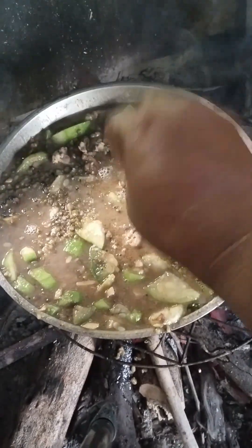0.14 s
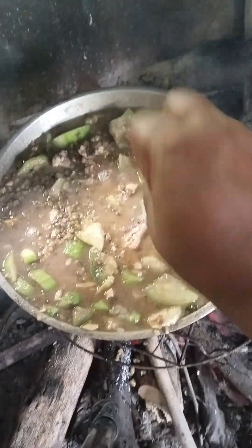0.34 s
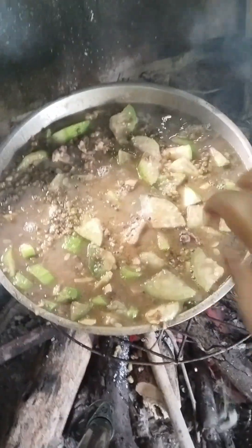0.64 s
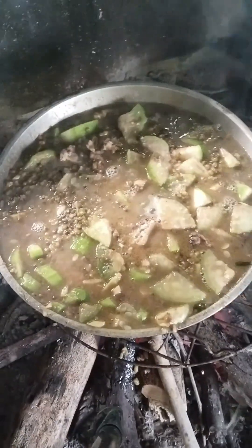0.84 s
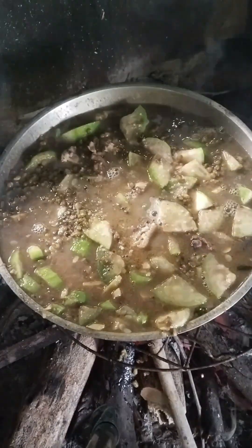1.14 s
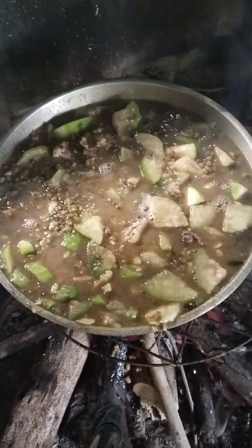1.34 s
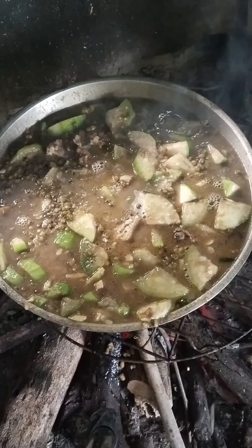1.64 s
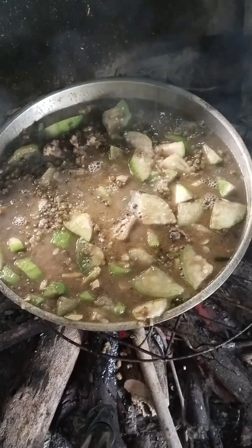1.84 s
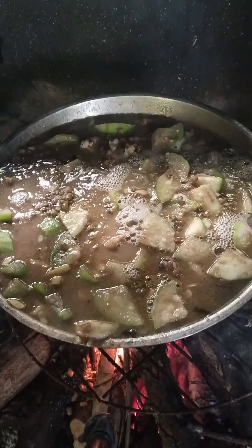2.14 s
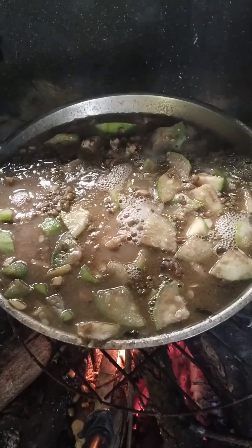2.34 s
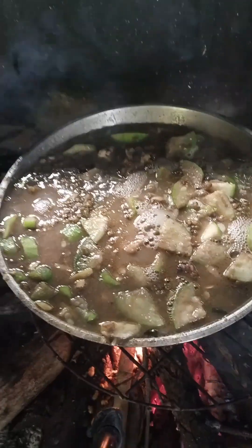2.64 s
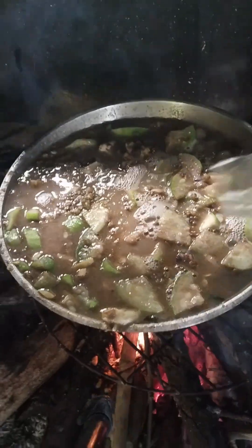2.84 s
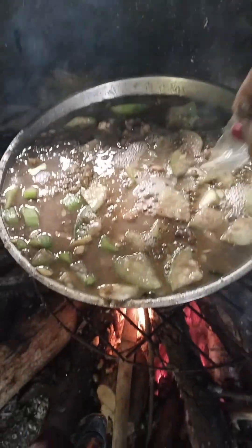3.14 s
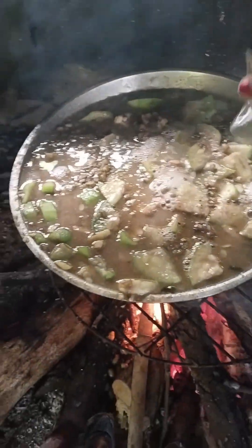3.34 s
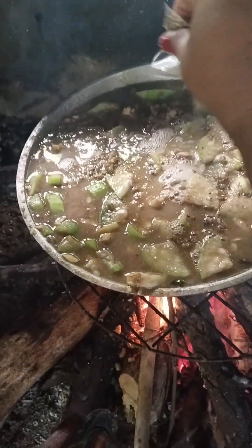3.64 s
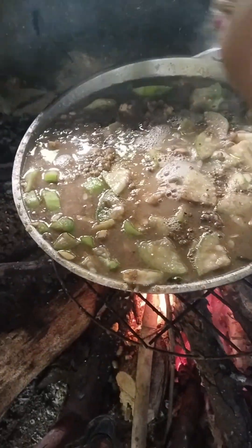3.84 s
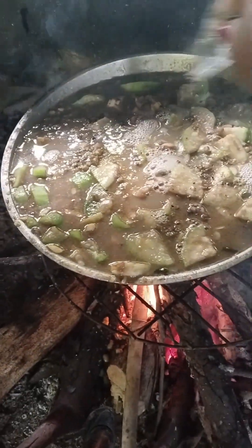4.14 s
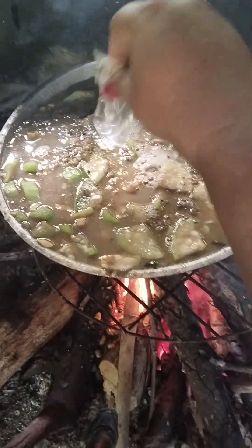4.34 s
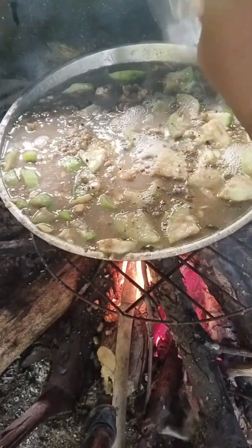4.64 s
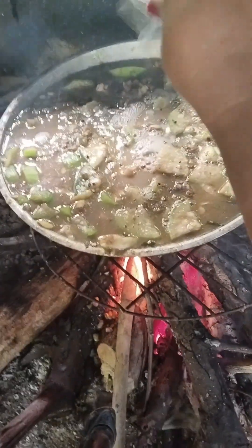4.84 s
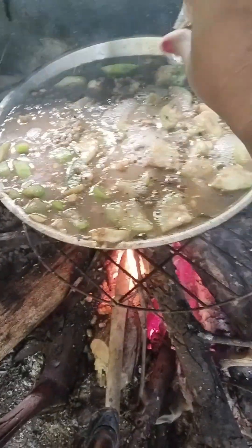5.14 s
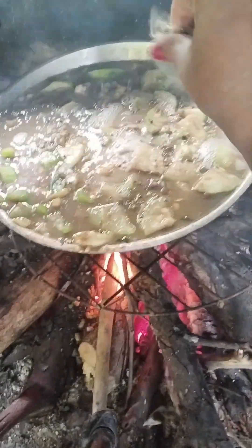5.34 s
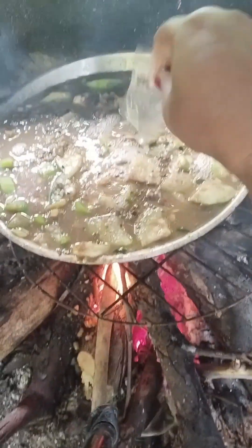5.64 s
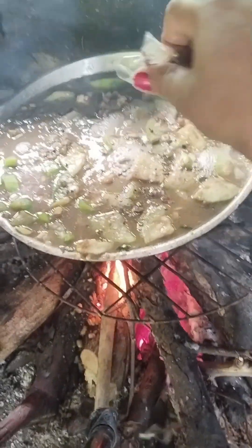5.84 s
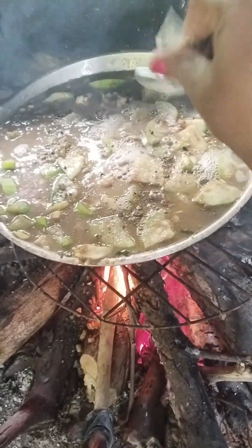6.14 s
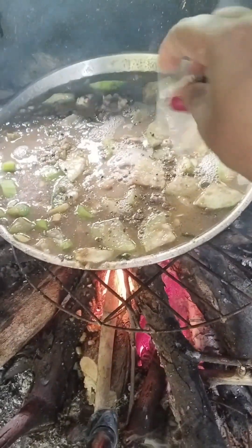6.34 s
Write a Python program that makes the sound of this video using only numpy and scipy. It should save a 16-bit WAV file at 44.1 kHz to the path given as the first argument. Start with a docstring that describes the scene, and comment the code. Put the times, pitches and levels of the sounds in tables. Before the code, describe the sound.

At the very start a small, brief splash falls into soup bubbling softly in a wide metal pot, over the low rumble of a wood fire. Two birds whistle faintly until about 1.6 seconds, and twigs pop three times between 0.6 and 1.1 seconds. Thin insect hiss runs behind everything, and a very faint motor drones far away. At about 2.2 seconds the motor stops and the sound is suddenly closer: the boil is louder and busier, with plops that make the pot ring lightly and occasional low gulps of steam. From 2.3 seconds to the end, around 6.5 seconds, a hand crumples a thin plastic sachet close by in irregular crinkles and sharp snaps, louder than the boil. The strongest snap comes at 4 seconds, with another dense flurry from 5.1 to 5.6. Two faint hoots sound near 3.6 seconds. The open shelter adds a short, soft echo.

```python
"""A wide metal pot of soup boils over a wood fire under an open shelter: bubbles collapse and make
the pot ring. At first a handful splashes in, two birds whistle, twigs pop, a motor drones far off
and insects hiss. Then the phone is nearer and the boil harder, while a hand crumples a plastic
sachet whose film buckles and snaps. Two faint hoots sound during the crumpling."""
import sys
import numpy as np
from scipy import signal
from scipy.fft import rfft, irfft
from scipy.io import wavfile
from scipy.ndimage import uniform_filter1d

SR = 44100
rng = np.random.default_rng(int(sys.argv[2]) if len(sys.argv) > 2 else 0)


def inscribe(sig):
    """Save sig as 16-bit PCM at rate SR to the path in sys.argv[1].

    A 1-D sig is mono; a 2-D sig holds one channel per row.
    Samples are clipped to [-1, 1] before scaling.
    """
    pcm = np.round(np.clip(np.atleast_2d(sig).T, -1, 1) * 32767)
    wavfile.write(sys.argv[1], SR, pcm.astype(np.int16))


N = 286517
NEAR_S = 2.19  # the phone is close to the pot from here on
MIC_LAG_S = 0.00022  # the right microphone is further from the pot
FILM_ALIKE = 0.12  # share of crackling noise common to both sides

# Tone of the background noise, far and near: frequency_hz, gain_db
FAR_TONE = [(15, -83), (25, -12.5), (120, -4), (200, -9), (270, -4.5), (326, -13), (480, -11), (555, -5),
            (640, -10), (796, -16), (1230, -21.5), (1840, -20), (2760, -21), (8140, -28.5), (9070, -18.5),
            (9840, -23), (16000, -36.5)]
# (the dips near 4.9 and 12.5 kHz come from the phone's audio coding)
NEAR_TONE = [(15, -26), (25, -17.5), (195, 1), (309, -3), (641, -5.5), (1520, -16.5), (2760, -15.5),
             (3720, -14), (4870, -31), (6050, -24.5), (10400, -6.5), (11600, -11), (12500, -28),
             (16000, -34)]
# Bands of insect hiss: centre_hz, width_hz, level_db
INSECT_BANDS = [(6500, 2000, -72), (8230, 660, -66.5), (10300, 1600, -62.5)]
# Whistles and low hoots: start_s, length_s, pitch_hz, level_db, drop_hz
HIGH_BIRD_NOTES = [(0., 0.11, 2950, -68, 45), (.24, 0.11, 3000, -61, 196), (.352, 0.041, 3020, -67, 52),
                   (.512, 0.078, 2960, -60, 77), (.612, 0.019, 2930, -61, 22), (.655, 0.04, 2940, -66, 33),
                   (.75, 0.036, 2930, -58, -26), (.804, 0.024, 2940, -58.5, 170),
                   (.865, 0.019, 2950, -61, 80), (.96, 0.026, 2900, -61, 23), (1.012, 0.02, 2844, -60, 75),
                   (1.04, 0.031, 2840, -63.5, 0), (1.137, 0.052, 2800, -63, 150),
                   (1.29, 0.045, 2700, -68, 90), (1.36, .05, 2660, -74, 20), (1.432, 0.02, 2550, -70, 28)]
LOW_BIRD_NOTES = [(.24, .06, 1790, -70, 30), (.485, .094, 2110, -71, 0), (.67, .07, 1740, -75, 0),
                  (1.31, .07, 1770, -72.5, 30), (1.58, .037, 1820, -68, 0)]
HOOT_NOTES = [(3.56, 0.065, 323.7, -60, -5), (3.62, 0.12, 444, -61.5, 31)]
# Fire pops, soft fizzes and plastic creases flipping:
# start_s, peak_db, centre_hz, left_minus_right_db, bright_db, rattle_db
FIRE_POPS = [(.6444, -37, 9100, 1, -2, 5), (0.8712, -23.5, 6540, 3, -11, -7),
             (1.059, -42, 10200, 7, -23, -7)]
SOFT_FIZZES = [(.062, -41, 14000, 5, 0, -20), (.113, -49, 11000, 3, 3, -20), (.346, -47, 14000, 3, 0, -20),
               (.545, -49, 8950, 3, 3, -20)]
CREASE_SNAPS = [(2.3223, -20.5, 4100, -5, 2, -31), (2.5641, -30.5, 9450, -5, -23, -16),
                (2.6264, -45, 10100, -7, -12, -10), (2.6424, -23, 9900, 4, -2, -9.5),
                (2.7763, -35.5, 9900, 1.5, -14, -7), (2.8777, -22, 4600, 2, 2, -12),
                (2.983, -43, 8000, 2, -6, -17), (3.0101, -33.5, 7080, 11, -2, -18),
                (3.022, -45, 7500, 1, -6, -20), (3.0355, -28.5, 5000, 6, 19, -23),
                (3.087, -43, 7500, 4, -6, -20), (3.096, -39, 6000, 0, -3, -20),
                (3.1064, -28, 9800, 3.0, -12, -10), (3.1194, -20.5, 8100, 4, 2, -12),
                (3.154, -30, 7000, 7, -4, -14), (3.1585, -35, 9000, 3, -6, -14),
                (3.337, -36, 7500, 7, -6, -18), (3.3714, -39, 6260, 11, -12, -12),
                (3.381, -32, 7500, 2, -6, -12), (3.4104, -39, 5590, 5, -12, -12),
                (3.4491, -39, 10300, 2.5, -12, -12), (3.5323, -30, 10500, 7, -3, -1),
                (3.5453, -25.5, 4540, -3, -9, -2), (3.6354, -32.5, 8370, 6, 3, -14),
                (3.6597, -35, 10200, 6, -12, -12), (3.706, -37, 7390, -3, -9, -18),
                (3.724, -32, 8000, 3, -4, -15), (3.7609, -30, 8700, 6, -2, -15),
                (3.775, -33, 7000, 6, -4, -12), (3.8114, -44, 10200, 3.0, -12, -12),
                (3.8583, -36, 10100, 8, -12, -6), (3.8721, -32, 7750, 15, -10, -12),
                (3.8994, -34, 4510, 12, -14, -14), (3.9179, -26, 8000, 8, -2, -14),
                (3.9787, -25, 4860, -2, -4, -15), (4.0182, -14, 2900, -2, -14, -28),
                (4.0184, -6.5, 4750, 0, -7, -28), (4.079, -36, 2740, 0, -8, -12),
                (4.1048, -22.5, 7810, 4, -12, -8), (4.153, -29, 5240, 9, -8, -6),
                (4.157, -26, 5030, 5, -6, -6), (4.1834, -32, 5180, 1, 2, -8), (4.2233, -26, 9100, 8, 6, -6),
                (4.2735, -32, 9800, 3, -6, -8), (4.2509, -27.5, 4220, 9, -3, -10),
                (4.2924, -31, 6300, 8, -8, -10), (4.4237, -24, 8580, 7, -12, -10),
                (4.4952, -31.5, 2750, 2, -12, -9), (4.5261, -25.5, 7860, 14, -14, -21),
                (4.6193, -30, 9540, 7, -12, -12), (4.6759, -18, 9700, 4, -17, -13),
                (4.7561, -28, 5570, 4, -12, -8), (4.811, -43, 9560, -1, -12, -12),
                (5.0099, -22.5, 3570, -2, -5, -31), (5.0744, -32, 7400, 6, -12, -14),
                (5.1194, -34, 9160, 1.5, -12, -12), (5.1437, -19, 4200, -2, 5, -12),
                (5.1612, -20, 7960, 6, -8, -7), (5.225, -40, 7340, 8, -12, -12),
                (5.265, -27, 7840, 9, -14, -14), (5.324, -23, 8660, 0, -10, -14),
                (5.344, -20, 8100, 4.0, -12, -10), (5.3608, -15.5, 8000, 9, -24, -12),
                (5.372, -26, 3800, 0, -6, -8), (5.4286, -30, 7740, 5, -8, -3),
                (5.4445, -29.5, 3730, 5, -10, -10), (5.479, -42, 2700, 6, -8, -8),
                (5.4784, -41, 7060, 2.5, -12, -14), (5.5019, -25.5, 10200, 6, -16, -5),
                (5.5547, -48, 2700, -6, -18, -11), (5.572, -31, 7000, 6, -4, -6),
                (5.5835, -26, 3700, 5, 0, -5), (5.592, -37, 8500, 1, -6, -11),
                (5.6197, -28, 5470, -1, -3, 1), (5.7586, -30, 7500, 6, -12, -9),
                (5.798, -23, 9200, 2, -18, -7), (5.827, -31, 9030, 3.5, -12, -12),
                (5.845, -37, 10200, 3, -12, -12), (5.891, -36, 8450, 0, -12, -12),
                (5.9065, -26.5, 3360, 6, -18, 0), (5.963, -24, 8100, -1, -12, -9),
                (5.97, -27, 8000, 3, -16, -9), (5.986, -31, 7270, 5, -14, -13),
                (6.0142, -34, 6600, 2.0, -12, -10), (6.029, -34, 7500, 3, -8, -20),
                (6.118, -22, 5400, 7, -9, 5), (6.291, -27, 7750, 10, -16, -6),
                (6.317, -39, 5970, 8, -12, -12), (6.3515, -37, 6600, 12, -12, -4),
                (6.3764, -27.5, 7440, 8, -12, 3), (6.4054, -26, 7410, 6, -12, -8)]
# Tone of the plastic film: frequency_hz, gain_db
FILM_TONE = [(530, -31.5), (900, 7.5), (1900, -7), (2550, 3), (2980, 3), (3280, 0), (3520, 1), (7080, -2),
             (7970, 2), (11200, -6.5), (15300, -6.5)]
# Papery rings of the film: pitch_hz, width_hz, level_db
FILM_RINGS = [(2610, 58, -2), (3490, 95, -7), (4166, 45, -4.5), (5240, 49, -4), (6300, 90, -10),
              (7895, 76, 0.5), (9960, 120, -2.5)]
# Faint rustle of the held sachet, growing in steps: start_s, gain_db
HELD_RUSTLE = [(2.66, -57), (4.05, -59.5)]
# Squeezes of the sachet: start_s, hold_s, gain_db, dull_db, bright_db
HAND_SQUEEZES = [(2.317, 0.004, -39.5, -10, -8), (2.557, 0.0075, -62, 5.5, 6), (2.63, 0.0058, -73, -22, 19),
                 (2.766, 0.013, -69, -4, 15), (2.867, 0.0075, -44.5, -14, -13), (3.017, 0.014, -64, 5, -4),
                 (3.096, 0.026, -47, 0, 2), (3.141, 0.011, -53, -7, -10), (3.359, 0.044, -46, -7, -4),
                 (3.442, 0.017, -54.5, -27, -8), (3.53, 0.021, -38.5, -6.5, -6), (3.63, 0.063, -49, -9, -5),
                 (3.7, 0.0066, -32.5, -5.5, -2), (3.76, 0.033, -42.5, -8, -5),
                 (3.852, 0.065, -45, -11, -4.5), (4.007, 0.0064, -42, -10, 1), (4.071, 0.021, -39.5, -8, 0),
                 (4.1, 0.033, -39, -7, -5), (4.145, 0.016, -37, -11, -4), (4.179, 0.017, -42, -7.5, 0),
                 (4.241, 0.029, -38.5, -6, -6), (4.288, 0.022, -43.5, -9.5, -5),
                 (4.404, .012, -49, -12, -2), (4.418, 0.042, -40, -11.5, -1),
                 (4.481, 0.041, -40, -10, -4.5), (4.613, 0.03, -43, -7.5, -3),
                 (4.671, 0.012, -39.5, -3.5, 5), (4.722, 0.044, -45.5, -9, -5), (4.804, 0.013, -44, -7, -4),
                 (4.892, 0.11, -53, -16, -9), (4.998, 0.0073, -46, -16, -18), (5.066, .01, -56, -16, -24),
                 (5.119, 0.039, -44, -7, -3), (5.145, 0.039, -35.5, -8, -10),
                 (5.222, 0.041, -43.5, -13.5, -6), (5.318, 0.01, -35, -6.5, -2.5),
                 (5.337, 0.038, -35.5, -10.5, -7), (5.44, 0.02, -41.5, -14.5, -2),
                 (5.475, 0.031, -41.5, -11, -7), (5.544, .01, -45.5, -1.5, 0),
                 (5.576, 0.016, -42, -9.5, -7), (5.613, 0.016, -43, -11, -1),
                 (5.742, 0.082, -46.5, -10, 0.5), (5.896, 0.03, -38, -7, -7), (5.957, 0.011, -49, 0.5, 0),
                 (6.003, 0.009, -56, -21, 4), (6.097, 0.014, -46, -3, -3), (6.111, 0.0042, -34.5, -5.5, -5),
                 (6.242, 0.079, -54.5, -2.5, 1), (6.36, 0.072, -40.5, -6, -2.5)]
# Modes (natural tones) of the full pot: pitch_hz, gain_db, ring_s (time to fade by 60 dB)
POT_MODES = [(423, -2.5, 0.096), (524.6, -4.5, 0.09), (661, -1.5, 0.058), (766, -1, 0.022),
             (900, -2.5, 0.062), (1177, 7.5, 0.033), (1600, 8, 0.037)]
# Large bubbles collapsing: time_s, peak_db, pitch_hz
BIG_BUBBLES = [(.148, -52, 1730), (.989, -51, 580), (1.062, -56, 780), (1.243, -54, 510), (1.273, -54, 520),
               (1.489, -54, 805), (1.744, -51, 620), (1.838, -53, 1500), (1.935, -53.5, 520),
               (1.953, -46.5, 604), (2.108, -53, 660), (2.179, -57, 536), (2.203, -41, 803),
               (2.204, -46, 1400), (2.223, -42.5, 1535), (2.235, -43, 700), (2.236, -47, 1500),
               (2.281, -43, 800), (2.282, -36, 1150), (2.295, -49, 1500), (2.33, -47, 1200),
               (2.351, -47, 865), (2.377, -39.5, 900), (2.379, -38, 1150), (2.395, -49, 660),
               (2.459, -42.5, 895), (2.468, -36, 1570), (2.5, -45, 905), (2.512, -39, 1160),
               (2.517, -41, 1600), (2.523, -45, 1140), (2.54, -38.5, 890), (2.556, -43, 860),
               (2.57, -39, 1650), (2.599, -61, 650), (2.693, -46.5, 624), (2.705, -48, 930),
               (2.736, -38, 827), (2.791, -42.5, 940), (2.861, -46, 1430), (2.917, -42, 870),
               (2.927, -45, 660), (2.987, -44, 900), (3.06, -46, 715), (3.11, -35, 1650),
               (3.119, -37, 1170), (3.129, -36, 1380), (3.155, -44, 750), (3.249, -45.5, 1060),
               (3.309, -39.5, 1630), (3.357, -52, 650), (3.488, -47.5, 704), (3.743, -43, 1570),
               (3.809, -48, 885), (3.849, -45, 820), (3.881, -42.5, 1340), (3.931, -43.5, 880),
               (4.002, -48, 714), (4.011, -46, 433), (4.091, -38, 1020), (4.208, -37, 1246),
               (4.313, -46, 617), (4.476, -41.5, 1110), (4.508, -42.5, 620), (4.644, -44, 1080),
               (4.808, -49, 780), (4.887, -45.5, 1500), (4.953, -42, 1480), (5.001, -41, 900),
               (5.015, -58, 670), (5.063, -39.5, 1230), (5.074, -37.5, 1560), (5.147, -40, 1440),
               (5.189, -48, 550), (5.318, -56, 650), (5.357, -46, 1400), (5.45, -41, 1200),
               (5.621, -52, 494), (5.649, -49, 925), (5.754, -48, 940), (5.873, -40, 1210),
               (5.909, -44, 1680), (5.911, -35, 1060), (5.938, -46, 720), (6.263, -40.5, 1680),
               (6.36, -44, 646), (6.428, -47, 660), (6.437, -52, 595)]
# Low gulps of steam: start_s, peak_db, pitch_hz
STEAM_GULPS = [(2.238, -49, 203), (2.508, -53, 197), (3.29, -50, 202), (3.947, -54, 230), (4.118, -53, 234),
               (4.493, -50, 174), (5.16, -50, 220), (5.514, -53.5, 200), (6.112, -55, 244),
               (6.458, -54, 191)]


def undb(db):
    """Turns decibels into a gain."""
    return 10 ** (np.asarray(db) / 20)


def level(x, db):
    """Sets the average (RMS) level."""
    return x * undb(db) / np.sqrt(np.mean(x ** 2))


def band(x, hz, width):
    """A resonance: keeps the sound around hz."""
    return signal.lfilter(*signal.iirpeak(min(hz, .45 * SR), hz / width, SR), x)


def colour(x, points):
    """Filters a sound to follow a tone table."""
    hz, db = np.transpose(points)
    curve_db = np.interp(np.log(np.linspace(1, SR / 2, 4097)), np.log(hz), db)
    cepstrum = irfft(curve_db * np.log(10) / 20)
    cepstrum[1:4096] *= 2  # folded so that nothing rings ahead of the sound
    cepstrum[4097:] = 0
    return signal.fftconvolve(np.atleast_2d(x), irfft(np.exp(rfft(cepstrum)))[None], axes=1)[:, :N]


def walk(rate):
    """A smooth random wobble, about 1 in size, with rate new values a second."""
    k = int(SR / rate)
    steps = np.repeat(rng.standard_normal(N // k + 1), k)
    return 1.656 * uniform_filter1d(uniform_filter1d(steps, k), k)[:N]


def swell(start, hold, rise, fall):
    """A loudness curve that rises until start, holds, then falls (all in seconds)."""
    t = np.arange(N) / SR - start
    return np.exp(np.minimum(t, 0) / rise - np.maximum(t - hold, 0) / fall)


def noise_pair(shape, alike):
    """Left and right noise that share a part."""
    both, left, right = rng.standard_normal((3, *shape))
    return np.sqrt(alike) * both + np.sqrt(1 - alike) * np.array([left, right])


def clicks(rate, spread_db):
    """Random clicks, about rate a second, a few much stronger than the rest."""
    size = undb(spread_db * np.minimum(rng.exponential(size=N), 3.5)) * np.sign(rng.standard_normal(N))
    return size * (rng.random(N) < rate / SR)


def rattle(rate, tail_s):
    """The power of random tiny hits, each dying away quickly."""
    return signal.lfilter([1], [1, -np.exp(-1 / (tail_s * SR))], clicks(rate, spread_db=2) ** 2)


def pan(x, pan_db):
    """Makes the left side pan_db louder than the right."""
    return x * undb(np.array([[pan_db], [-pan_db]]) / 2)


def add(out, s, grain, db, pan_db):
    """Mixes in a short sound at s seconds, scaled to a peak of db and then panned."""
    i = int(s * SR)
    part = pan(grain * undb(db) / np.abs(grain).max(), pan_db)[:, :N - i]
    out[:, i:i + part.shape[1]] += part


def motor():
    """A far motor: two tones an octave apart and a higher hum swell, sag in pitch and stop at NEAR_S."""
    t = np.arange(N) / SR
    waver = 1 + .02 * walk(12)
    sag_hz = 2.01 * t
    phase = 2 * np.pi * np.cumsum((126.8 - sag_hz) * waver) / SR
    hum_phase = 2 * np.pi * np.cumsum((267 - 2 * sag_hz) * waver) / SR
    flicker_db = 2.5 * np.array([[walk(9), walk(9)] for _ in range(3)])
    low = undb(-72 + flicker_db[1]) * np.sin(phase / 2)
    upper = undb(-73 + flicker_db[0]) * np.sin(phase) + undb(-73 + flicker_db[2]) * np.sin(hum_phase)
    tones = low + swell(1, N / SR, rise=.8, fall=1) * upper
    return pan(np.sqrt(2) * swell(0, NEAR_S, rise=1, fall=.02) * tones, 4.3)


def insects():
    """Insects hiss in high bands of noise that flicker together."""
    hiss = sum(level(band(band(rng.standard_normal((2, N)), hz, width), hz, width), db)
               for hz, width, db in INSECT_BANDS)
    return pan(undb(.43 * walk(22.9)) * hiss, 2)


def background_noise():
    """Flames roar low and alike on both sides, the treble is spread wide; each band flickers alone."""
    roar = 0
    for hz in 30 * 2 ** np.arange(0, 9.5, .5):
        alike = .62 / (1 + (hz / 580) ** 2)
        mid, side = band(rng.standard_normal((2, N)), hz, hz / 3)
        stereo = np.sqrt(1 + alike) * mid + np.sqrt(1 - alike) * side * np.array([[1], [-1]])
        roar = roar + undb(1.7 * walk(9.9)) * stereo
    near = uniform_filter1d(1. * (np.arange(N) > NEAR_S * SR), size=600)
    far_noise, near_noise = level(colour(roar, FAR_TONE), -61.5), level(colour(roar, NEAR_TONE), -57)
    return pan((1 - near) * far_noise + near * near_noise, 2)


def birds():
    """Whistles and hoots waver on their way through the trees; echoes smear the farther bird most."""
    out, t = 0, np.arange(N) / SR
    for notes, smear in [(HIGH_BIRD_NOTES, .3), (LOW_BIRD_NOTES, 3), (HOOT_NOTES, .1)]:
        waver = 1 + .004 * walk(70)
        flutter = undb(1.5 * walk(70)) * (1 + smear * walk(350)) / np.hypot(1, smear)
        for s, length, hz, db, drop_hz in notes:
            progress = np.clip((t - s) / length, 0, 1)
            slide_up = 1 - .022 * min(length / .08, 1) * np.exp(-np.maximum(t - s, 0) / .02)
            pitch = (hz - drop_hz * progress ** 4) * slide_up  # holds, then bends at the end
            tone = np.sin(2 * np.pi * np.cumsum(pitch * waver) / SR)
            loudness = undb(db - 5 * progress ** 3) * swell(s + .008, length - .008, .009, .011)
            out = out + loudness * flutter * tone
    return pan(out, 8.8)


def splash():
    """The last of a handful falls into the soup: a grainy wash that dies away."""
    noise = noise_pair((N,), alike=.13)
    wash = band(band(noise, 2300, 500), 2300, 500) + .86 * band(band(noise, 2980, 600), 2980, 600)
    wash += .68 * band(noise, 2700, 2000)
    wash *= np.sqrt(1 + rattle(rate=180, tail_s=.0017))
    return pan(swell(0, 0, rise=1, fall=.06) * level(wash, -44.5), 1)


def snaps(rows, rise_s, click_db):
    """A crease flips or a twig pops: a click, a burst and a fading rattle. A slow rise makes a fizz."""
    out, t = np.zeros((2, N)), np.arange(4000) / SR
    onset = 1 - np.exp(-(t / rise_s) ** 2)
    crack = .29 * np.exp(-t / .00044) + np.exp(-t / (.0002 + 1.4 * rise_s))
    tail = np.exp(-np.log(1000) * t / .055)
    noises = noise_pair((len(rows), 4000), FILM_ALIKE).swapaxes(0, 1)
    for (s, db, hz, pan_db, bright_db, rattle_db), noise in zip(rows, noises):
        cut_lows = signal.butter(4, max(1200, .34 * hz), "high", fs=SR, output="sos")
        # a click on the right starts early there, so it reaches both microphones together
        lead = np.array([[0], [round(MIC_LAG_S * SR) * (pan_db < 0)]])
        click = undb(click_db) * (np.arange(4000) == round(rise_s * SR) - lead)
        burst = signal.sosfilt(cut_lows, click + noise * onset * (crack + undb(rattle_db) * tail))
        ring = band(band(burst, hz, .35 * hz), hz, 1.3 * hz)
        broad = band(band(band(burst, 3000, 13000), 4500, 13000), 3000, 9200)
        tick = undb(bright_db) * band(burst, 7150, 5600)
        add(out, s, 1.45 * ring + .12 * broad + tick, db, pan_db)
    return out


def folds(hz, width, per_second=130, scatter=.06):
    """Small folds in the film each ring at their own pitch near hz, from their own side."""
    out, t = np.zeros((2, N + 1500)), np.arange(1500) / SR
    count = int(per_second * N / SR)
    when, size, side, detune = rng.random((count, 4)).T
    pitch = hz * (1 + scatter * (2 * detune - 1))
    envelope = (1 - np.exp(-t / .00045)) * np.exp(-np.pi * width * t)
    grains = np.sin(2 * np.pi * pitch[:, None] * t) * envelope
    gains = undb(-4 * np.log(np.maximum(size, .03)))  # a few much stronger than the rest
    starts = (when * (N - 40)).astype(int)
    for i, grain, gain, share, lag in zip(starts, grains, gains, side, rng.integers(0, 30, count)):
        out[0, i:i + 1500] += gain * np.sqrt(.26 + .5 * share) * grain
        out[1, i + lag:i + 1500] += gain * np.sqrt(1 - .99 * share) * grain[:1500 - lag]
    return out[:, :N]


def sachet():
    """Squeezed plastic buckles hundreds of times a second: patches hiss, folds ring and tick."""
    buckles = rattle(rate=110, tail_s=.0026)
    noise = colour(noise_pair((N,), FILM_ALIKE), FILM_TONE)
    patches = []
    for hz in (2240, 3405, 4550, 6420, 7300, 10200, 14100, 16600):
        hiss = band(band(noise, hz, .5 * hz), hz, .77 * hz)
        patches.append(hiss * np.sqrt(buckles + 3 * rattle(rate=120, tail_s=.0095)))
    rings = [level(folds(hz, width), db) for hz, width, db in FILM_RINGS]
    ticks = np.array([clicks(170, spread_db=4.5) for _ in range(2)]) + clicks(120, spread_db=5)
    ticks = level(band(band(ticks, 6200, 7600), 6100, 9500), -11)
    dull = level(sum(patches[:2]), 0) + undb(-9) * sum(rings[:2])
    mid = level(sum(patches[2:6]), 0) + undb(-12.5) * sum(rings[2:]) + ticks
    bright = level(sum(patches[6:]), 0)
    held = sum(undb(db) * swell(s, N / SR, rise=.03, fall=1) for s, db in HELD_RUSTLE)
    gains = undb([[-11], [-3], [-4]]) * held  # dull, mid, bright
    for s, hold, db, dull_db, bright_db in HAND_SQUEEZES:
        squeeze = undb(db) * swell(s + .006, hold, rise=.003, fall=.017)
        gains += undb([[dull_db], [-3], [bright_db]]) * squeeze
    return pan(gains[0] * dull + gains[1] * mid + gains[2] * bright, 2)


def steam_gulps():
    """Steam gulps through the soup in low, slightly rising notes."""
    out, t = np.zeros((2, N)), np.arange(4000) / SR
    for s, peak_db, hz in STEAM_GULPS:
        gulp = np.sin(2 * np.pi * hz * t * (1 + 1.3 * t)) * t * np.exp(-t * hz / 1.08)
        add(out, s, gulp, peak_db, pan_db=2.6)
    return out


def bubble_crowd():
    """Many small bubbles knock the pot and keep it ringing, louder and brighter once it is near."""
    near = np.arange(N) > NEAR_S * SR
    shared = clicks(rate=190, spread_db=6.5)
    knocks = [shared + 2.2 * clicks(rate=250, spread_db=5) for _ in POT_MODES]
    upper_db = np.where(near, -18, -28) + 3 * walk(8.9)
    crowd = 0
    for (hz, db, ring_s), knock in zip(POT_MODES, knocks):
        ring = level(band(knock, hz, width=np.log(1000) / np.pi / ring_s), 0)
        crowd = crowd + undb(db + upper_db * (hz > 850)) * ring
    return pan(undb(np.where(near, -64.5, -75.5) + .46 * walk(16)) * crowd, 2.9)


def single_bubbles(strays=190, rise_s=.002976, soup_damping=2.3):
    """Larger bubbles glide up in pitch as they close and ring the pot; the soup shortens the ring."""
    out, t = np.zeros((2, N)), np.arange(4000) / SR
    modes = np.array([undb(db) * np.sin(2 * np.pi * hz * t) * 1000 ** (-soup_damping * t / ring_s)
                      for hz, db, ring_s in POT_MODES])
    # middling bubbles at random moments join the big ones
    when, size, depth = rng.random((strays, 3)).T
    stray_s = .01 + when * (N / SR - .02)
    stray_db = np.where(stray_s > NEAR_S, -47, -54) - 8 * depth
    stray_hz = 480 * 2 ** (.9 * size)
    bubbles = [*zip(stray_s, stray_db, stray_hz), *BIG_BUBBLES]
    # each spot in the pot drives the modes with other strengths
    spots = rng.uniform(.11, 1, (len(bubbles), len(POT_MODES)))
    onset = 1 - np.exp(-(t / rise_s) ** 2)
    for (s, peak_db, hz), spot in zip(bubbles, spots):
        bubble = np.sin(2 * np.pi * hz * t * (1 + 6 * t)) * np.exp(-t * hz / 1.88)
        octaves_apart = np.abs(np.log2(np.array(POT_MODES)[:, 0] / hz))
        ring = (spot * undb(-6 - 7 * octaves_apart)) @ modes  # modes near its pitch ring most
        add(out, s - rise_s, (bubble + ring) * onset, peak_db, pan_db=2.6)
    return out


def shelter_echo(sound, ring_s=.12, echo_db=-10):
    """The shelter throws back a short, soft echo."""
    t = np.arange(8000) / SR
    walls = rng.standard_normal((2, 8000)) * np.exp(-np.log(1000) * t / ring_s) * (t > .002)
    walls = band(walls, 2900, 12400)
    walls *= undb(echo_db) / np.sqrt(np.sum(walls ** 2) / 2)
    return signal.fftconvolve(sound.mean(axis=0)[None], walls, axes=1)[:, :N]


def scene():
    """Mixes the sounds at the pot with the birds, their echo and the background."""
    close = splash() + sachet() + snaps(CREASE_SNAPS + FIRE_POPS, rise_s=.0007, click_db=8)
    close += snaps(SOFT_FIZZES, rise_s=.013, click_db=-60)
    close += bubble_crowd() + single_bubbles() + steam_gulps()
    close[1] = np.roll(close[1], round(MIC_LAG_S * SR))
    direct = close + birds()
    return direct + shelter_echo(direct) + background_noise() + insects() + motor()


def record(dry):
    """The phone loses the deepest bass, turns down the highest treble and cuts the very top."""
    no_rumble = signal.sosfilt(signal.butter(2, 35, "high", fs=SR, output="sos"), dry)
    shelf = signal.sosfilt(signal.ellip(8, .2, 50, 15500, fs=SR, output="sos"), no_rumble)
    shelf += .008 * no_rumble
    return signal.sosfilt(signal.ellip(10, .2, 80, 16600, fs=SR, output="sos"), shelf)


dry = scene()
out = record(dry)
inscribe(out)
```